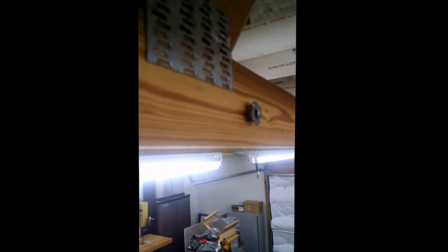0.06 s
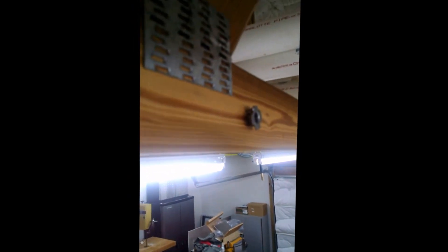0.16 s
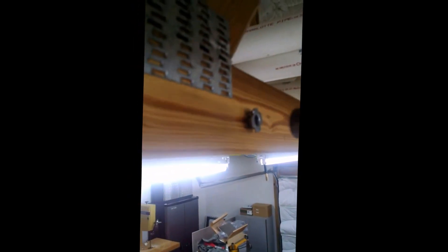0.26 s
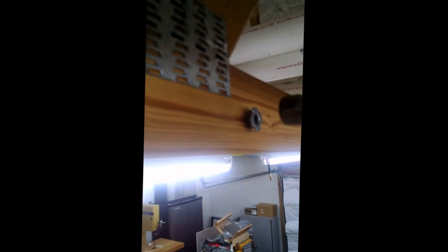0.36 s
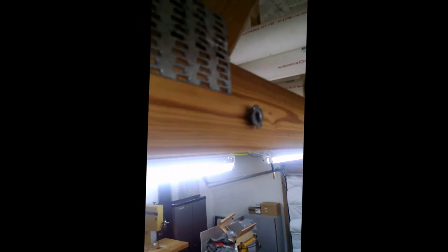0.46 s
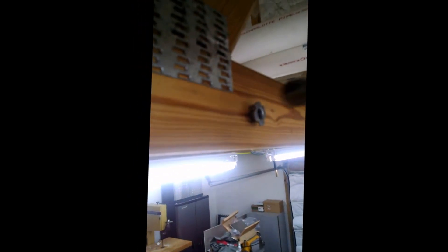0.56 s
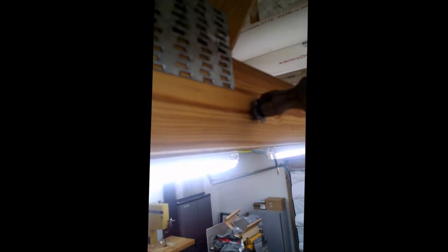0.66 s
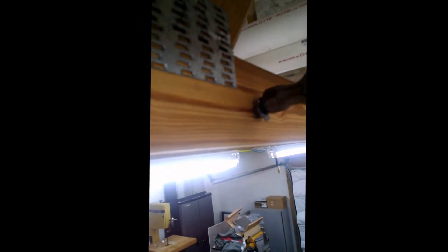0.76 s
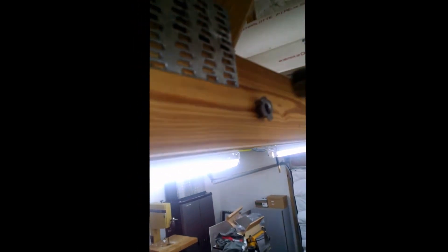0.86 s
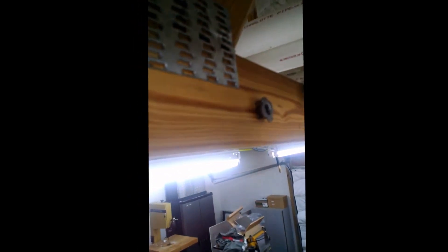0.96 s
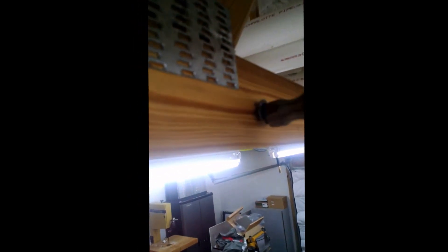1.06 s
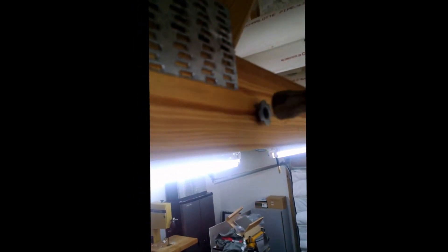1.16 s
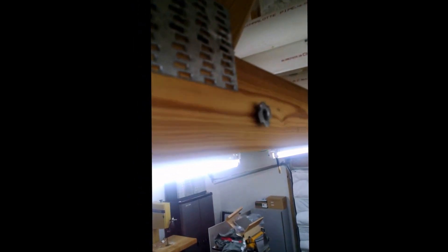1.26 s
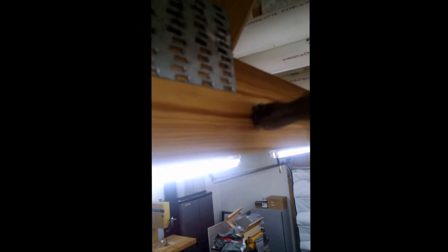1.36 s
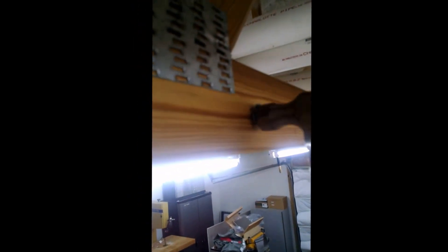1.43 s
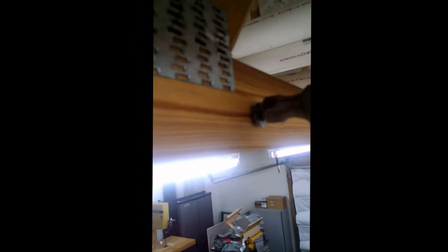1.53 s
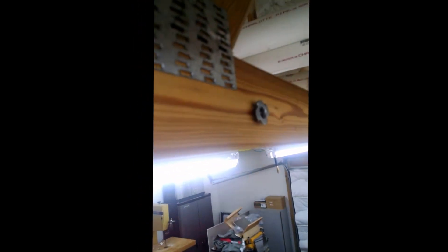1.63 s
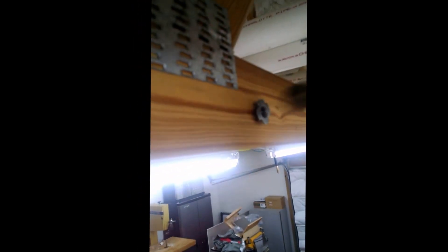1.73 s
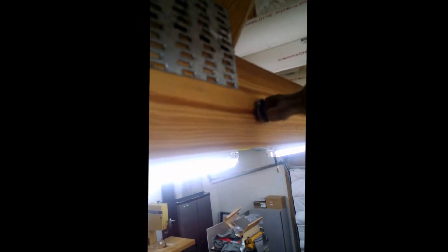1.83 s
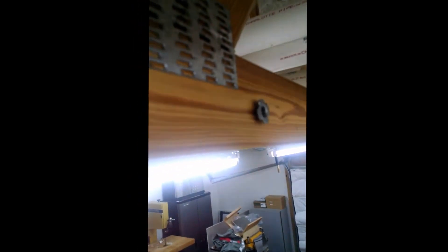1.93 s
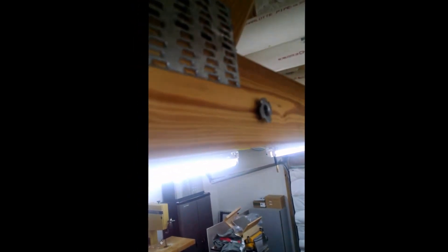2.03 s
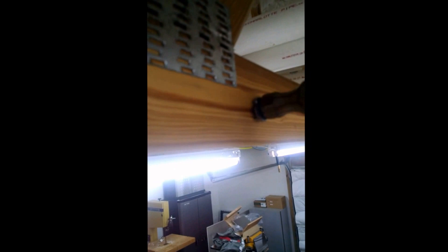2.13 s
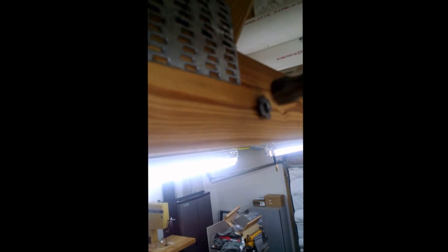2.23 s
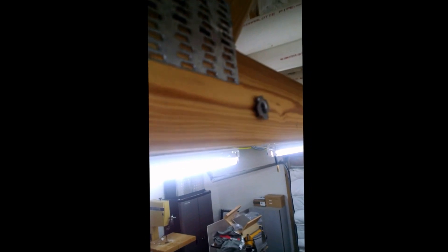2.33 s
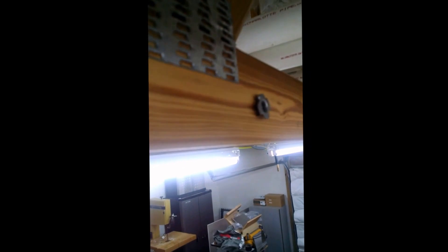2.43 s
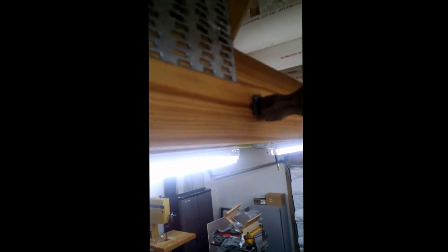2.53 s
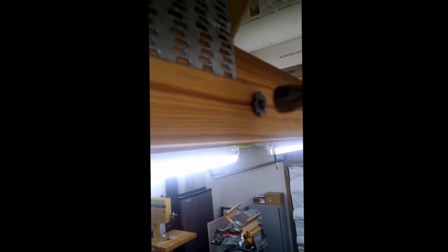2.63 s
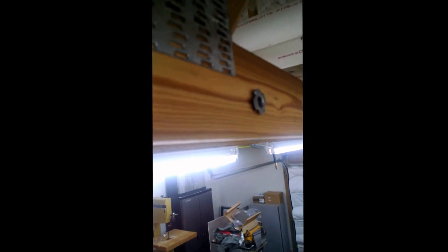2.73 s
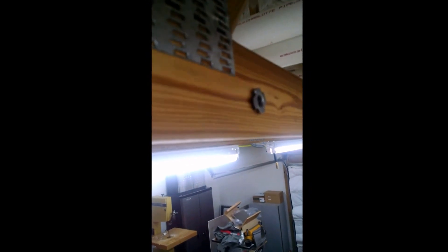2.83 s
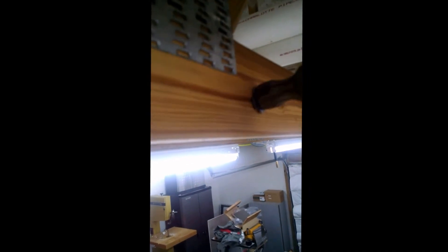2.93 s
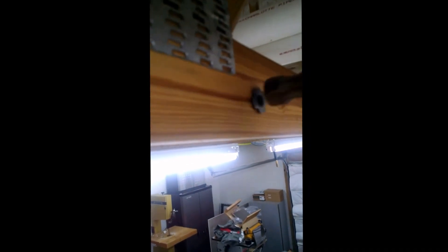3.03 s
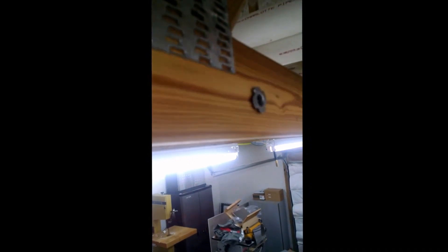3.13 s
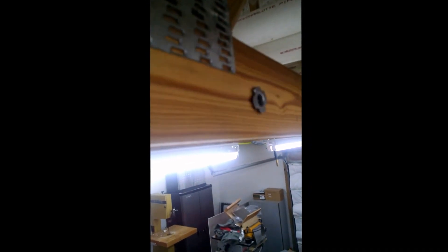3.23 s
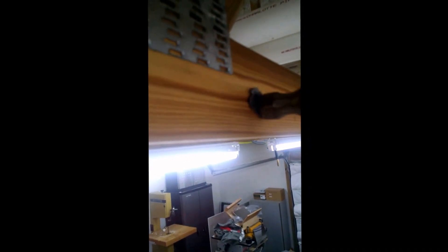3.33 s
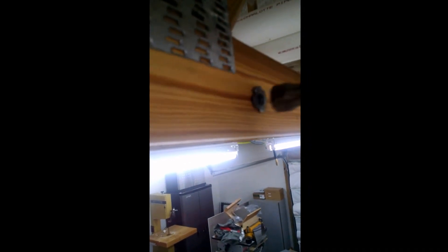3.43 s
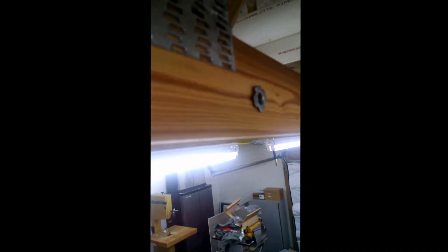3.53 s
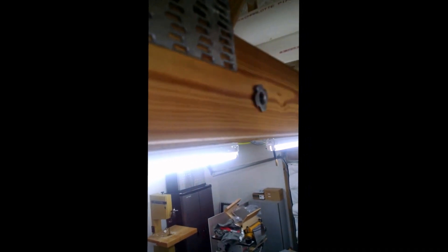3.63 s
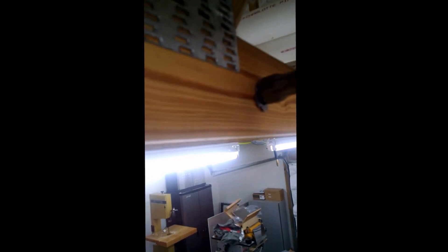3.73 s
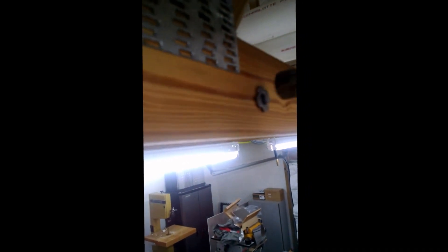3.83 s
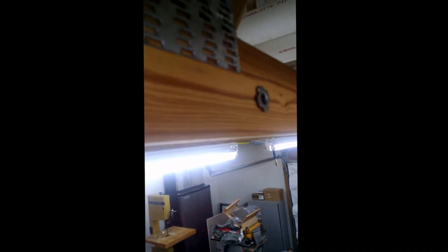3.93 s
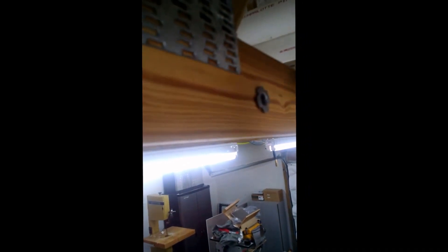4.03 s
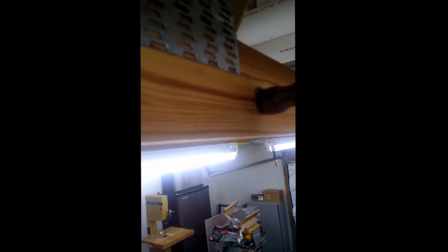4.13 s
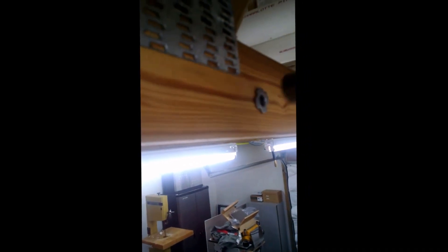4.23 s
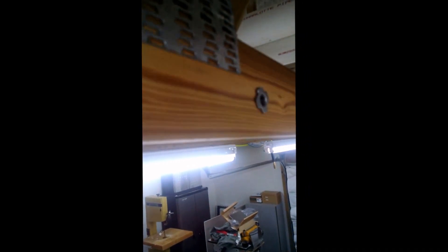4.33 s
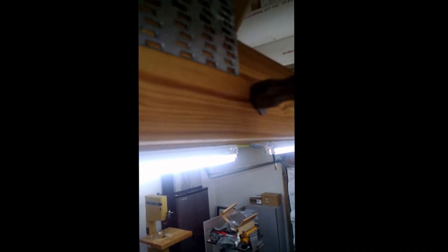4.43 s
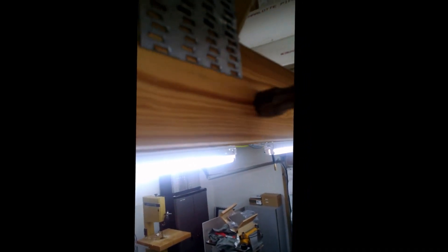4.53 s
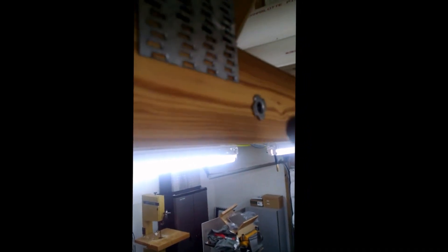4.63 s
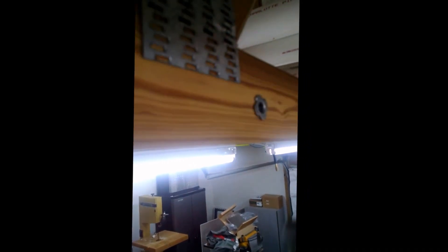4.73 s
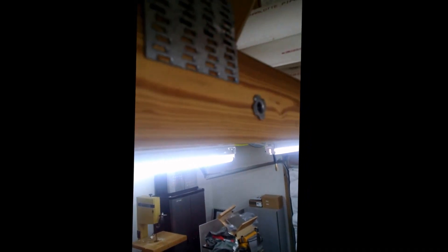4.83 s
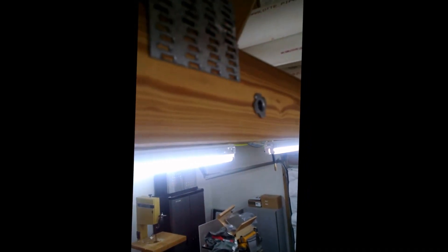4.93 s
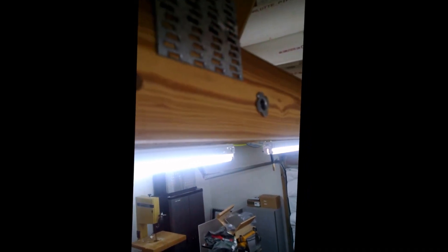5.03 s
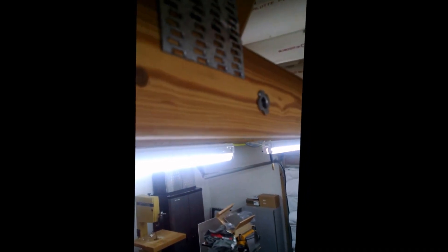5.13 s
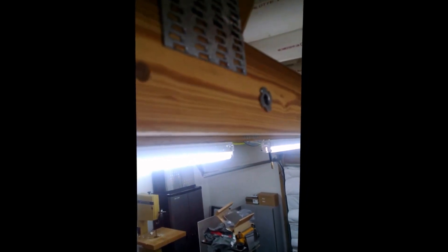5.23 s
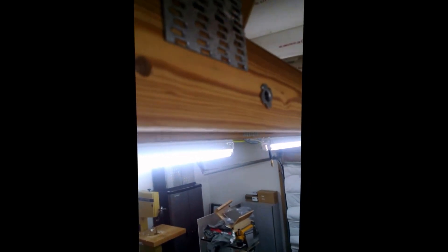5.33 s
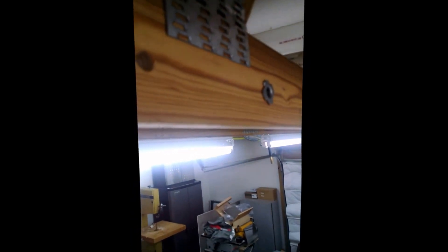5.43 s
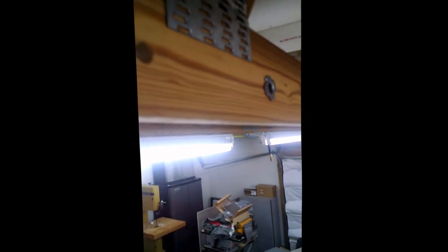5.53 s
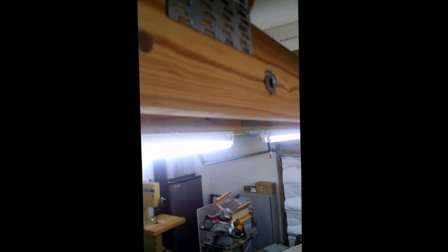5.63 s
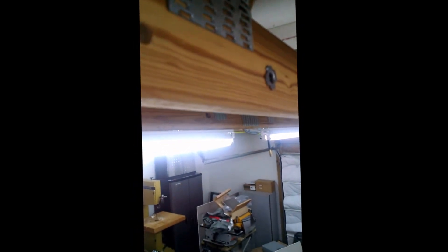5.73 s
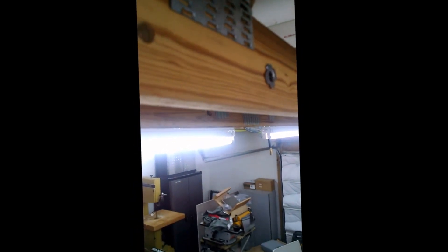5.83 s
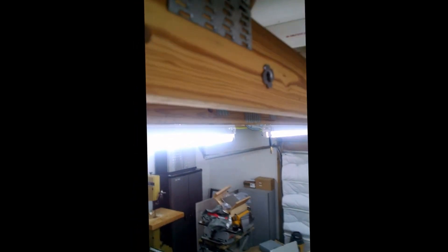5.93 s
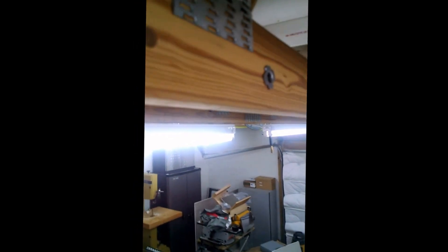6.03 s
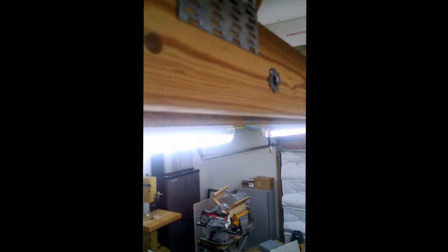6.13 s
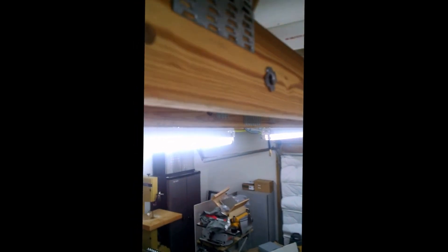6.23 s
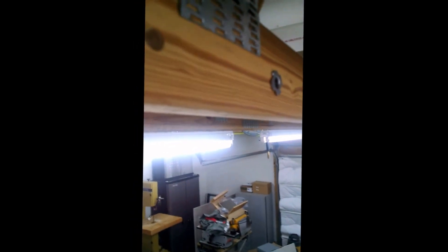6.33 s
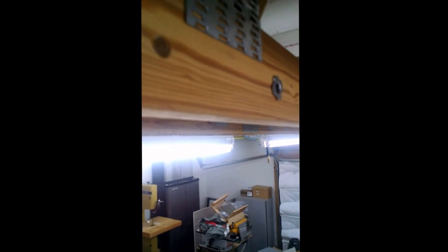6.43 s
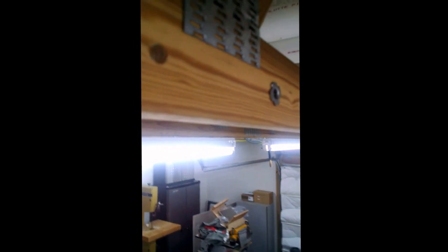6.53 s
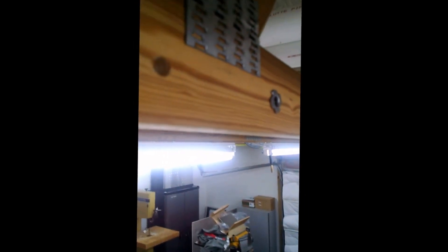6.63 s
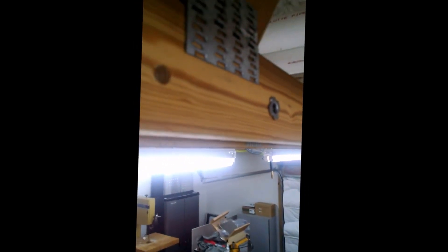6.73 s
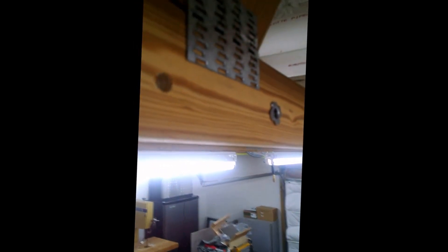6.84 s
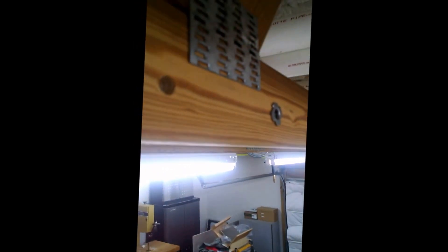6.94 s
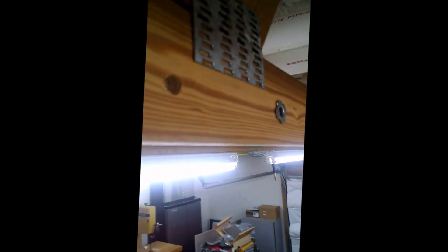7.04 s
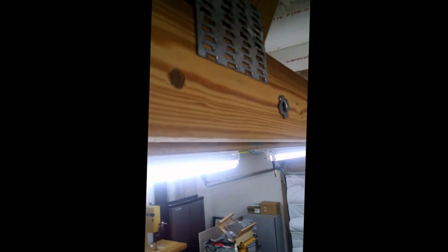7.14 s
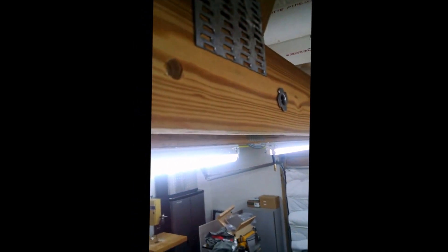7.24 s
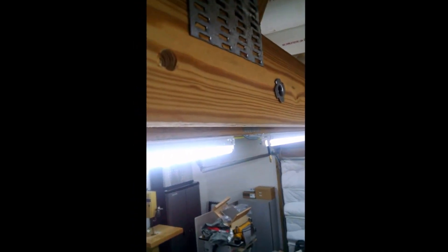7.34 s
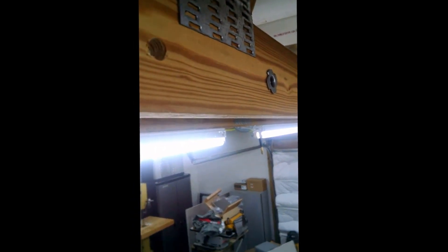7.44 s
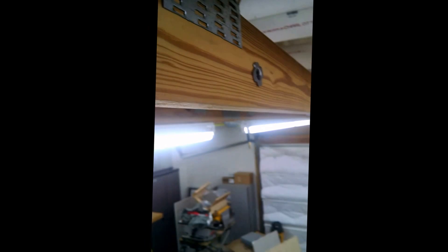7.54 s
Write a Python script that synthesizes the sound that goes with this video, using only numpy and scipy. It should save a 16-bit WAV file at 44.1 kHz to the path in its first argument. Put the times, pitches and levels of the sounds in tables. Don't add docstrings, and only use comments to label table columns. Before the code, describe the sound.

A quiet workshop opens with low murmur, hiss, hum and a faint machine whine near 1.4 kilohertz that slows and vanishes by 0.6 seconds. At 0.68 a hammer hits a steel nut in a wooden beam, somewhat weaker than what follows. Ten more blows come roughly every 0.4 seconds until 4.5, growing firmer: a sharp steel snap, a short hollow mid-low wooden ring, a low jolt in the hand and a brief echo. Softer, duller rebounds fall shortly after each. The background is ducked while the blows sound. After a lull, the hammer drops on a bench at 5.44, bouncing rapidly to about 5.8 with loose parts buzzing and sizzling, dying by 6.1. From about 6.15 to 7.6 fingers scrape and rustle against the phone case, with irregular close clicks and low bumps, stronger on the right, as the background hiss slowly rises.

```python
import sys
import numpy as np
from scipy import signal
from scipy.fft import rfft, irfft, next_fast_len
from scipy.io import wavfile
from scipy.ndimage import uniform_filter1d

SR = 44100
rng = np.random.default_rng(int(sys.argv[2]) if len(sys.argv) > 2 else 0)


def linear_from_db(decibels):
    return 10 ** (np.asarray(decibels, float) / 20)


def file_out(sig):
    cols = np.atleast_2d(sig).T
    lim = np.clip(cols, -1, 1)
    pcm = np.round(lim * 32767).astype(np.int16)
    wavfile.write(sys.argv[1], SR, pcm)


N = 334278
ONSET_S = .0018
HISS_FOLLOWS = .65


def unit(x):
    return x / np.sqrt(np.mean(x ** 2) + 1e-20)


def along(points, hz):
    f, v = np.transpose(points)
    return np.interp(np.log(hz + 1), np.log(f + 1), v)


def curves(rows):
    s, *cols = np.transpose(rows)
    return [np.interp(np.arange(N) / SR, s, c, left=-150, right=-150) for c in cols]


def filtered(x, response):
    n = x.shape[-1]
    m = next_fast_len(n + 8192)
    return irfft(rfft(x, m) * response(np.fft.rfftfreq(m, 1 / SR)), m)[..., :n]


def smooth_twice(x, span):
    return uniform_filter1d(uniform_filter1d(x, span), span)


def noise(spectrum, alike, grain_db, grain_s):
    a, b, lumps = rng.standard_normal((3, N))
    alike = np.clip(alike, 0, 1)
    pair = np.array([a, alike * a + np.sqrt(1 - alike ** 2) * b])
    lumps = unit(smooth_twice(lumps, int(grain_s * SR) + 1))
    return unit(filtered(pair * linear_from_db(grain_db * lumps), lambda hz: linear_from_db(along(spectrum, hz))))


def burst(t, t60, spectrum):
    colour = unit(filtered(rng.standard_normal((2, len(t))), lambda hz: linear_from_db(along(spectrum, hz))))
    return colour * linear_from_db(-60 * t / t60)


def add(track, s, x):
    part = track[:, round(s * SR):][:, :x.shape[1]]
    part += x[:, :part.shape[1]]


# frequency in Hz, t60 in seconds.
SHOP_DECAY = [(60, 1), (160, 0.49), (420, 0.19), (1100, 0.33), (2900, 0.4), (7700, 0.42), (15000, 0.33)]
# frequency in Hz, level in dB.
SHOP_COLOUR = [(60, -0.5), (300, 7.5), (1000, 5), (3000, -2), (8000, -4), (15000, -6.5)]


def shop(x):
    hz, t, z = signal.stft(rng.standard_normal((2, SR // 2)), SR, nperseg=256)
    decay_db = along(SHOP_COLOUR, hz)[:, None] - 60 * t / along(SHOP_DECAY, hz)[:, None]
    tail = signal.istft(z * linear_from_db(decay_db), SR, nperseg=256)[1]
    return signal.fftconvolve(x, tail / np.linalg.norm(tail[0]), axes=1)


# time in seconds, gain in dB.
GAIN = [
    (0, 3),
    (.68, 0),
    (.75, -13),
    (4.6, -12),
    (5.45, -18.5),
    (6.1, -13),
    (7.58, -5),
]
# frequency in Hz, level in dB per Hz.
MURMUR = [(20, -2), (40, 4), (70, -9), (130, 3), (300, 2), (680, -9.5), (1400, -15.5), (3000, -17.5),
          (5000, -40)]
HISS = [(600, -9.5), (1500, 0.5), (3000, -2.5), (7000, -10), (11000, -5.5), (15000, 0.5)]
# time in seconds, pitch in Hz, level in dB.
WHINE = [
    (0, 1440, -62),
    (.25, 1446, -64.5),
    (.32, 1453, -72),
    (.42, 1410, -65),
    (.52, 1420, -64),
    (.6, 1370, -86),
]
# frequency in Hz, level in dB.
HUM = [(37, -74.5), (130, -66), (278, -64.5)]


def room_tone():
    t = np.arange(N) / SR
    gain_db, = curves(GAIN)
    murmur_db, hiss_db = -52.5 + gain_db, -61 + HISS_FOLLOWS * gain_db
    hum = sum(linear_from_db(db + 60.0) * np.sin(2 * np.pi * hz * t) for hz, db in HUM)
    murmur = noise(MURMUR, 0.56, grain_db=1.5, grain_s=0.018) * linear_from_db([[-3], [1.5]])
    murmur = murmur + hum * [[.3], [1]]
    hiss = noise(HISS, 0.035, grain_db=-4.7, grain_s=0.01) * linear_from_db([[-1.5], [1.5]])
    whine_hz, whine_db = curves(WHINE)
    whine = linear_from_db(whine_db + 3.5) * np.sin(2 * np.pi * np.cumsum(whine_hz) / SR) * [[.4], [1]]
    return linear_from_db(murmur_db) * murmur + linear_from_db(hiss_db) * hiss + whine


# loudest moment in seconds,
# build-up in seconds, # release in seconds, scrape in dB, skin hiss over the scrape in dB.
STROKES = [(5.2, 0.5, .5, -80.5, -11), (5.974, 0.12, 0.056, -57, 13), (6.157, 0.0079, 0.053, -64, 12.5),
           (6.3, 0.13, 0.026, -63.5, 9.5), (6.329, 0.01, 0.13, -55.5, 16.5),
           (6.385, 0.0096, 0.012, -29, -11), (6.442, .02, 0.032, -48, -4), (6.47, .04, 0.12, -56.5, -5),
           (6.552, 0.03, 0.18, -46.5, 2), (6.63, 0.034, 0.17, -56, 4.5), (6.78, 0.059, 0.098, -57, -5),
           (6.873, 0.0055, 0.019, -39.5, 6.5), (6.928, 0.031, 0.096, -46, -1),
           (7.126, 0.12, 0.18, -46.5, 1), (7.221, 0.035, 0.022, -38, 10.5), (7.26, 0.076, 0.15, -52.5, -13),
           (7.412, 0.17, 0.068, -34, 0), (7.472, 0.042, 0.086, -43.5, 2), (7.544, 0.058, 0.055, -38, 0.5),
           (7.579, 0.018, .05, -33.5, 6)]


def strokes():
    s, build_s, release_s, db, skin_db = np.transpose(STROKES)[:, :, None]
    coarse = np.arange(0, N, 32)
    late = coarse / SR - s
    fall_db = 20 * np.where(late < 0, -late / np.abs(build_s), late / np.abs(release_s))
    press = linear_from_db(db - fall_db)
    fine = lambda v: np.interp(np.arange(N), coarse, v.sum(axis=0))
    return fine(press), fine(press * linear_from_db(skin_db))


# start in seconds, peak in dB, click in dB, push in Hz.
BUMPS = [(5.031, -90, -3, 150), (5.099, -70, -11, 149.4), (5.329, -56.5, 3, 150.8),
         (6.154, -37.5, -20, 120.6), (6.302, -33.5, 2.5, 252), (6.329, -39, -4.5, 118.5),
         (6.381, -34.5, 13.5, 150), (6.419, -22, -23, 90), (6.44, -18.5, -4.5, 170),
         (6.546, -28.5, -10, 148), (6.604, -30, -15, 120), (6.639, -18, -14, 163), (6.682, -22, -21, 278),
         (6.814, -33.5, -6.5, 253), (6.871, -22, -16.5, 216), (6.879, -31, -23, 81), (6.905, -31, -6, 190),
         (6.987, -19.5, -22, 101), (7.084, -28.5, -11, 151), (7.114, -21.5, -12, 275),
         (7.139, -46, -4, 203), (7.154, -23, -9.5, 262), (7.227, -19.5, -3, 75), (7.365, -28, -18, 90),
         (7.417, -25, -4, 81), (7.570, -20.5, -23, 93)]
# frequency in Hz, level in dB per Hz.
RUMBLE = [(15, -14), (40, -12.5), (100, -9), (250, -11), (500, -42)]
SCRAPE = [(120, -15.5), (300, 15), (800, 9.5), (1500, 2.5), (3000, 1), (6000, -32.5)]
SKIN = [(2500, -20), (5000, -10), (7500, -10), (8800, -5.5), (12000, -3.5), (15000, -2.5)]
CLICK = [(300, 14.5), (2000, -0.5), (6000, -8), (15000, -3.5)]  # (Hz, dB)


def fingers():
    scrape, skin = strokes()
    grip = np.abs(uniform_filter1d(scrape, int(.08 * SR) + 1)) / linear_from_db(-50)
    out = linear_from_db(-51) * grip ** 0.36 * noise(RUMBLE, 0.9, grain_db=-0.5, grain_s=0.0131)
    out += linear_from_db(3.0) * scrape * noise(SCRAPE, 0.076, grain_db=3.0, grain_s=0.0074)
    out += linear_from_db(3.0) * skin * noise(SKIN, 0.19, grain_db=2.5, grain_s=0.018)
    t = np.arange(SR // 20) / SR
    for s, db, click_db, push_hz in BUMPS:
        u = 2 * np.pi * push_hz * t
        push = -np.sin(u ** .8 * 1.4) * np.exp(-u / 4) * [[.15], [1.1]]
        click = linear_from_db(click_db) * burst(t, 0.012, CLICK)
        add(out, s + ONSET_S, linear_from_db(db + 1.0) * (push + click))
    return out * linear_from_db([[-8], [0.5]])


# frequency in Hz, width in Hz, level in dB.
BENCH = [(270, 350, -3.5), (327, 109, 12), (516, 121, 5), (875, 265, -4.5), (1440, 304, -2.5),
         (2250, 1060, -2.5), (2940, 690, -2.5)]


def bench(hz):
    total = 0
    for k, (centre, width, db) in enumerate(BENCH):
        damped = 1j * hz * width
        total = total + (-1) ** k * linear_from_db(db) * damped / (centre * centre - hz * hz + damped)
    return total


# start in seconds, peak in dB, brightness in dB,
# hardness in dB per octave.
BOUNCES = [
    (5.442, -9.5, -16, 2),
    (5.4782, -11, -0.5, 3.5),
    (5.5725, -13, -4, -1.5),
    (5.628, -10.5, -11, 2.1),
    (5.712, -18, -23, 2.5),
    (5.728, -19, -25, -1),
    (5.758, -28, -33, 5),
    (5.787, -27, -36, 0),
]
# time in seconds, shaking in dB.
RATTLE = [
    (5.445, -51),
    (5.47, -35),
    (5.52, -30),
    (5.57, -34),
    (5.65, -32.5),
    (5.78, -32.5),
    (5.9, -42.5),
    (6.1, -79),
]
# frequency in Hz, level in dB per Hz.
SIZZLE = [(1500, -28.5), (3000, -0.5), (5000, 6), (8000, -0.5), (12000, -6.5), (15000, 0)]


def dropped_hammer():
    out, t = np.zeros((2, N)), np.arange(SR // 8) / SR
    for s, db, bright_db, hard_db in BOUNCES:
        struck = lambda hz: bench(hz) * linear_from_db(hard_db * np.log2(np.clip(hz, 250, 4000) / 700))
        decay = linear_from_db(-60 * t / 0.015) + linear_from_db(-6 - 60 * t / 0.035)
        knock = unit(filtered(rng.standard_normal((2, len(t))), struck)) * decay
        snap = burst(t, .008, SIZZLE) + linear_from_db(-5) * burst(t, .04, SIZZLE)
        dry = linear_from_db(db - 0.5) * (knock + linear_from_db(bright_db) * snap)
        add(out, s + ONSET_S, dry)
        add(out, s + 0.0059, linear_from_db(-6) * shop(dry))
    body_db, = curves(RATTLE)
    since_landing = np.clip(np.arange(N) / SR - BOUNCES[0][0], 0, 1)
    sizzle_db = body_db + 6.5 - 48.5 * since_landing
    body = unit(filtered(noise([(100, 0)], 1.0, grain_db=5, grain_s=0.0025), bench))
    out += linear_from_db(body_db - 5) * body
    out += linear_from_db(sizzle_db - 4) * noise(SIZZLE, .3, grain_db=2.5, grain_s=.002)
    return out * linear_from_db([[-12], [2.5]])


# start in seconds, level in dB.
JOLTS = [(0.681, -10.5), (1.081, -3), (1.46, -14.5), (1.836, -26), (2.186, -17), (2.557, -10.5),
         (2.948, -12), (3.354, -12.5), (3.742, -25), (4.135, -3), (4.511, -11.5)]


def jolts():
    out, t = np.zeros((2, N)), np.arange(SR // 20) / SR
    for s, db in JOLTS:
        thump = linear_from_db(db - 60 * t / 0.039) * np.sin(2 * np.pi * 85 * t)
        add(out, s + ONSET_S, thump * [[1], [-.42]])
    return out


# frequency in Hz, level in dB, t60 in seconds.
BEAM = [(104.76, -30, .45), (170, -10.5, 0.086), (234, -13, 0.31), (266.1, -13, 0.45), (307.7, -5.5, 0.2),
        (362, -7, 0.15), (422.7, -1, 0.17), (468, -14.5, 0.38), (545.6, -0.5, 0.076), (640, -4.5, 0.041),
        (649.5, -4, 0.06), (721, -2.5, 0.077), (803, -18, 0.2), (903.4, -17.5, 0.011), (1080, -14, 0.039),
        (1111, -5, 0.02), (1190, -18.5, 0.018), (1370, -25.5, 0.012), (1796, -13, 0.058),
        (2050, -14.5, 0.017), (2870, -16.5, .04)]
# frequency in Hz, level in dB.
CRACK = [(110, -20), (300, 6), (1000, -7.5), (3000, -2.5), (6000, -5.5), (10000, -6), (14000, -0.5),
         (17000, -14)]
# (Hz, dB)
SLAP = [(150, -19.5), (500, 5.0), (1200, -10), (3000, -12.5), (6000, -37.5)]
SLOW_SLAP = [(150, -19.5), (350, 6.5), (800, -9.5), (1500, -9.5), (3500, -16), (6000, -34.5)]


def beam_ring(t, hard_db, damping, highest_hz):
    hz, level_db, t60 = np.transpose(BEAM)[:, :, None]
    strength, detune, shift = rng.standard_normal((3, len(BEAM), 1))
    tilt_db = hard_db * np.log2(np.clip(hz, 0, highest_hz) / 500)
    modes = linear_from_db(level_db + tilt_db + 3 * strength - 60 * damping * t / t60)
    phase = 2 * np.pi * hz * (1 + .012 * detune) * t
    return np.array([np.sum(modes * np.sin(phase + k * 0.26 * shift), axis=0) for k in range(2)])


def steel_crack(t, full_blow):
    bite = 1 + 3.18 * (t < .003) * full_blow
    crack = burst(t, 0.0056, CRACK) * bite + linear_from_db(1.0) * burst(t, 0.032, CRACK)
    nut = linear_from_db(-0.5 - 60 * t / 0.01) * np.sin(2 * np.pi * 3503 * t)
    return crack + nut * full_blow


def hammer(rows, wood_db, crack_db, wet_db, soft_s, damping, full_blow):
    out, t = np.zeros((2, N)), np.arange(SR // 2) / SR
    rise = 1 - np.exp(-t / soft_s)
    for s, db, bright_db, ring_db, hard_db in rows:
        wood = beam_ring(t, hard_db, damping, highest_hz=4000 if full_blow else 1400)
        wood = wood + linear_from_db(1.0 + hard_db) * burst(t, 0.02, SLAP)
        wood = wood + linear_from_db(1.0) * burst(t, .09 / damping, SLOW_SLAP)
        crack = linear_from_db(bright_db + crack_db) * steel_crack(t, full_blow)
        port = np.sin(2 * np.pi * 15350 * t + [[1.2], [0]]) * [[1.2], [1]]
        ring = linear_from_db(ring_db + 10 - 60 * t / .03) * port
        dry = linear_from_db(db) * rise * (linear_from_db(wood_db) * wood + crack) * linear_from_db([[.4], [-.4]])
        add(out, s + ONSET_S, dry + linear_from_db(db) * rise * ring)
        add(out, s + 0.01, linear_from_db(wet_db) * shop(dry[:, :SR // 6]))
    return out


# start in seconds, peak in dB, steel contact in dB,
# hardness in dB per octave.
REBOUNDS = [(0.732, -28.5, -18, -12.5), (1.129, -13.5, -24.5, -1), (1.51, -11.5, -43.5, 3.5),
            (1.888, -11, -30, -7.5), (2.232, -12.5, -31, 6.5), (2.602, -7, -33, 1.5),
            (2.638, -10, -25.5, -3), (2.677, -22, -34.5, 5), (2.994, -10.5, -34.5, 8.5),
            (3.052, -17, -34, 2.5), (3.46, -19.5, -33, 3), (3.469, -16.5, -23, 8), (3.787, -8, -27.5, 3),
            (4.238, -15.5, -30, 6), (4.557, -12, -37.5, 9)]


def rebounds():
    rows = [(s, db, steel_db, -36.5, hard_db) for s, db, steel_db, hard_db in REBOUNDS]
    return hammer(rows, wood_db=-12.5, crack_db=-15.5, wet_db=-8.5, soft_s=0.0013, damping=2.8,
                  full_blow=False)


# start in seconds, peak in dB, steel contact in dB, port ring in dB,
# hardness in dB per octave.
BLOWS = [(0.681, -17, -2.5, -8.5, -5), (1.081, -9.5, -11.5, -6, -3.5), (1.46, -8.5, -10.5, -14, -1.46),
         (1.836, -8.5, -10, -3, 3), (2.186, -6.5, -11.5, -14, -0.15), (2.557, -8.5, -7.5, -19, -0.9),
         (2.948, -4.5, -10.5, -14, -0.4), (3.354, -5, -11, -16.5, 0.1), (3.742, -4, -14.5, -40, -0.1),
         (4.135, -4, -13, -14.5, 4), (4.511, -4, -17, -20.5, 3.04)]


def blows():
    return hammer(BLOWS, wood_db=-9, crack_db=-0.5, wet_db=-12.5, soft_s=0.00018, damping=1.3,
                  full_blow=True)


def scene():
    beam = filtered(blows() + rebounds(), lambda hz: (1j * hz / (46.3 + 1j * hz)) ** 2)
    return beam + jolts() + dropped_hammer() + fingers() + room_tone()


def gate(x):
    power = np.mean(x ** 2, axis=0)
    level_db = lambda s: 10 * np.log10(np.abs(uniform_filter1d(power, int(s * SR))) + 1e-12)
    quiet = np.clip((-61 - level_db(.04)) / 2, 0, 1)
    flicker = unit(smooth_twice(rng.standard_normal(N), int(.004 * SR) + 1))
    braced = (level_db(.022) > -32) & (level_db(.002) < -46)
    flicker_db = -8 * quiet * np.clip(flicker, -.3, 2)
    return linear_from_db(flicker_db - 12 * uniform_filter1d(1. * braced, 40))


def top_cut(x):
    return signal.sosfilt(signal.butter(12, 16800, fs=SR, output="sos"), x)


# frequency in Hz, level in dB per Hz.
PREAMP = [(1500, -16.5), (3000, -1.5), (6000, -1.5), (10000, -2), (13000, -5.5), (15500, -9.5)]


def record(dry):
    cross_s = 17.25 / 44100
    late = filtered(dry[::-1], lambda hz: np.exp(-2j * np.pi * hz * cross_s))
    wide = dry - late * [[.78], [.15]]
    preamp_db = -64 + HISS_FOLLOWS * curves(GAIN)[0]
    wide = wide + linear_from_db(preamp_db) * noise(PREAMP, 0, grain_db=-1.5, grain_s=0)
    wide = filtered(wide * gate(wide), lambda hz: 1 / (1 + (hz / 15600) ** 200))
    return top_cut(np.clip(wide, -1, 1))


dry = scene()
out = record(dry)
file_out(out)
```